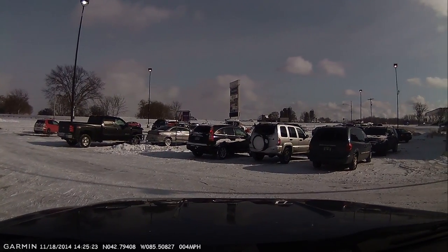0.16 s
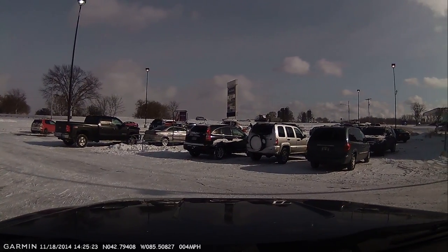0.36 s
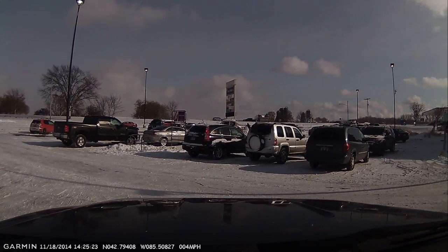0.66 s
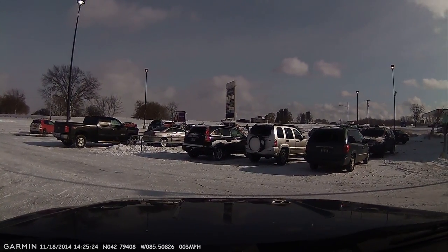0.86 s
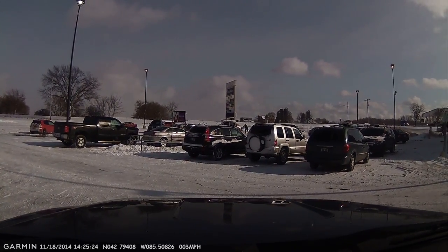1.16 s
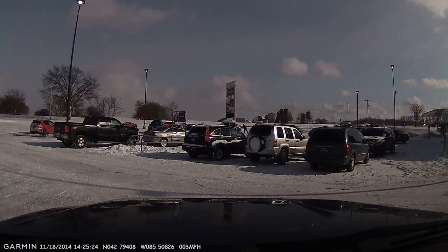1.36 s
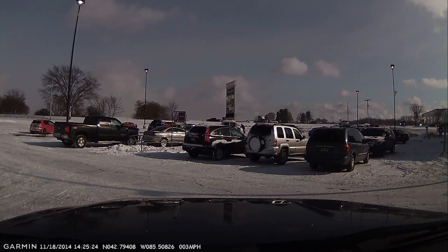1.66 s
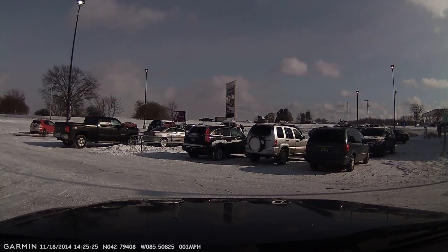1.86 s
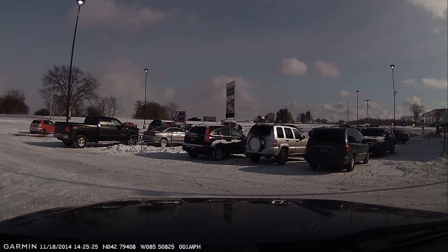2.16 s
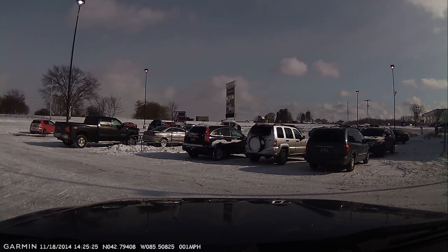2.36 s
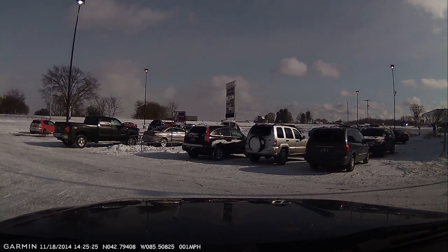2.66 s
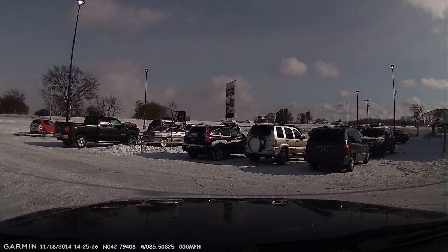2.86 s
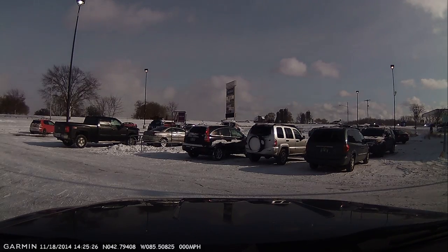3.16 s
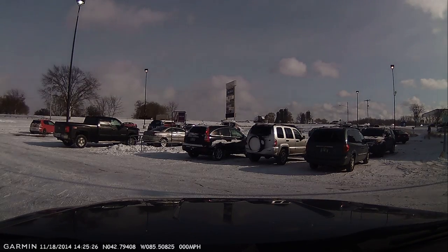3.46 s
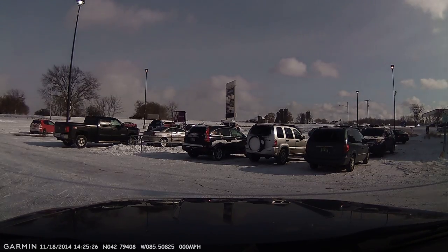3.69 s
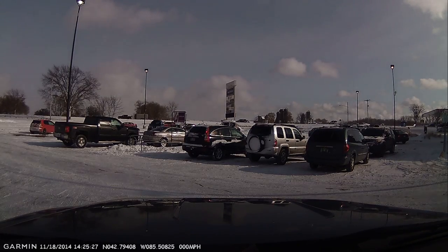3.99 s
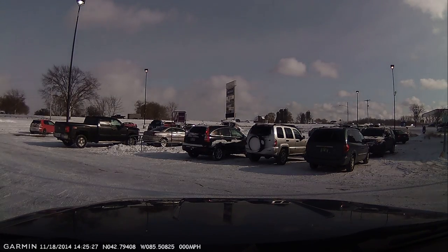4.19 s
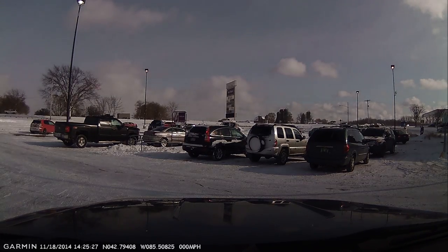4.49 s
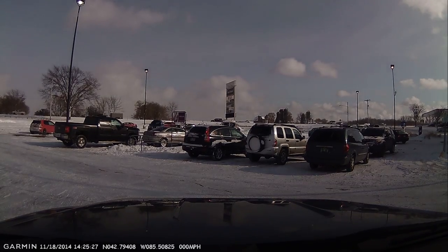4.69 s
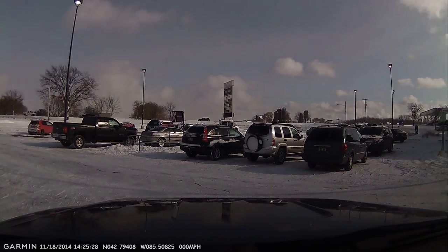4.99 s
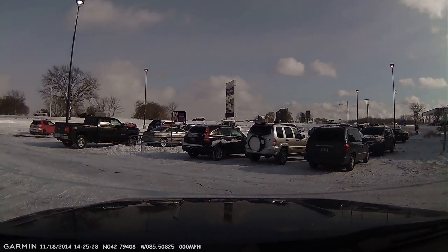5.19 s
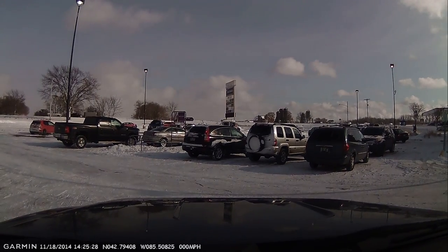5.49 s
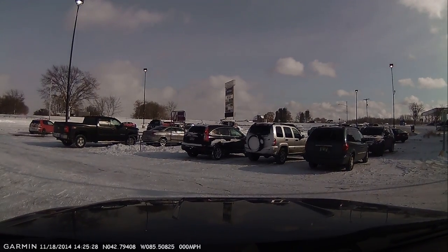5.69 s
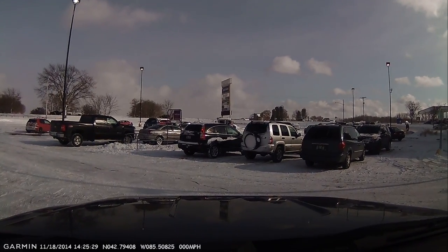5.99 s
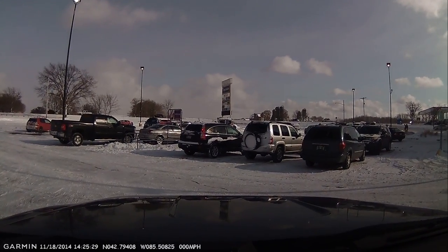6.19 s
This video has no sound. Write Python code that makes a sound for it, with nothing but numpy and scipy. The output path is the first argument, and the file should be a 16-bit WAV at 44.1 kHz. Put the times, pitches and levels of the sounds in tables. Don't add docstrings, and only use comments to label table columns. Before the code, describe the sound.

A small windscreen microphone in a closed cabin picks up low, bassy engine throb, rocking body thuds and constant hiss. First there is only slow rolling, then a flurry of scrapes and dull console knocks, two heavier blows amid coat rustle, faint fingertip rubbing, and bright, very close plastic clicks as the parked car idles.

```python
import sys
import numpy as np
from scipy import signal
from scipy.fft import rfft, irfft
from scipy.io import wavfile
from scipy.ndimage import uniform_filter1d

SR = 44100
rng = np.random.default_rng(int(sys.argv[2]) if len(sys.argv) > 2 else 0)


def generate_wav(signal):
    frames = np.transpose(np.atleast_2d(signal))
    scaled = np.clip(frames, -1, 1) * 32767
    pcm = np.round(scaled).astype(np.int16)
    wavfile.write(sys.argv[1], SR, pcm)


def magnitude_from_level(level_db):
    exponent = np.asarray(level_db, float) / 20
    return 10 ** exponent


N = 279594

# time in seconds, firing rate in Hz, firing tone in dB.
ENGINE = [(0, 37.2, -40.5), (.35, 37.22, -38), (.6, 37.2, -49.5), (1.6, 37.52, -44.5), (1.95, 46, -42.5),
          (2.6, 44.95, -47), (3.1, 43.5, -55), (3.7, 42.27, -49), (4.2, 41.42, -45.5), (5.7, 41.1, -45),
          (6.34, 41.1, -50)]
# time in seconds, level in dB.
ROLLING = [
    (0.0, -45.5),
    (0.92, -47),
    (1.78, -42),
    (2.14, -45),
    (3.0, -46),
    (3.6, -44.5),
    (3.83, -41.5),
    (4.45, -47.5),
    (5.08, -46),
    (6.34, -47),
]
# frequency in Hz, density in dB per Hz.
RUMBLE = [(29, -39), (50, -10.5), (81, -3.5), (135, -10.5), (199, -14), (264, -17.5), (296, -18),
          (474, -26), (516, -23.5), (1500, -41), (1950, -108), (3300, -120)]
# frequency in Hz, width in Hz, level in dB.
CABIN_MODES = [(70.5, 13.5, -47.5), (118, 18, -57.5), (150, 4, -62), (195.7, 10, -56), (537, 30, -67)]
# peak in seconds, frequency in Hz, level in dB, length in seconds.
ROCKS = [(0.018, 27.5, -33, .2), (0.364, 31.2, -42, .25), (0.488, 25, -37.5, .12), (.78, 20.7, -36, .5),
         (1.17, 21.2, -36.5, 0.29), (1.577, 26.8, -45, .3), (2.362, 28.2, -41.5, 0.21),
         (2.658, 29, -42.5, 0.16), (2.817, 28.7, -46.5, .3), (3.321, 28.8, -39, .18),
         (3.573, 26, -40.5, .2), (3.902, 26.7, -35.5, .25), (4.151, 28.2, -33.5, 0.17),
         (4.342, 28, -48, .12)]
# frequency in Hz, density in dB per Hz.
HISS = [(530, -12), (900, -7), (1470, -1), (1920, -2), (2360, -4), (13800, -7), (16000, -6)]

# peak in seconds, level in dB, tilt in dB per octave, ring in Hz, decay
# (t60) in seconds.
CRACKS = [
    (1.4418, -41, -5, 1698, 0.035),
    (1.6892, -44.5, -1, 5600, 0.02),
    (1.7708, -35.5, -2.5, 2700, 0.061),
    (1.8372, -42, 0, 2780, 0.09),
    (1.878, -54, -8, 2780, 0.071),
    (2.324, -50, -13, 1320, .04),
    (2.7129, -50.5, 0, 3180, 0.04),
    (3.516, -46.5, -7, 1880, 0.045),
    (4.095, -55, 5, 10950, 0.053),
    (4.112, -50, -5, 800, 0.06),
]
# peak in seconds, level in dB, tilt in dB per octave, ring
# in Hz, decay (t60) in seconds.
SCUFFS = [(1.042, -55, -4.5, 1340, .04), (1.170, -42.5, -6, 1200, 0.09), (1.233, -44, -5, 1600, .13),
          (1.325, -53, -9, 1480, 0.04), (1.431, -48, -11, 1000, 0.1), (1.453, -45.5, -16, 1200, 0.08),
          (1.697, -46.5, -12, 1040, 0.067), (1.785, -43, -8, 1610, 0.15), (1.846, -50, 4, 6400, 0.061),
          (1.905, -58, -9, 2800, 0.11), (2.337, -51, 0.5, 1410, 0.075), (2.577, -46, 1, 4500, 0.07),
          (2.594, -46.5, 2, 5910, 0.061), (2.745, -45, 2, 1445, 0.045), (3.217, -33, -4.5, 1250, 0.07),
          (3.225, -44.5, -1, 1800, 0.088), (3.759, -38.5, -5, 2040, 0.029), (5.584, -58, -2.5, 1895, 0.036),
          (1.165, -48, -10, 1000, .05), (3.768, -47, -14, 1000, .06), (1.25, -50, -12, 1700, .08),
          (2.592, -50, -14, 700, .05)]
# end of the build-up in seconds, level in dB, tilt in
# dB per octave, ring in Hz, decay (t60) in seconds.
SCRAPES = [
    (1.577, -43, -4, 2500, 0.2),
    (1.591, -38.5, -5, 1100, 0.1),
    (1.606, -49, -3, 1830, 0.07),
    (3.576, -46, -1.5, 2450, 0.076),
]
# peak in seconds, level
# in dB, tilt in dB per octave, ring in Hz, decay (t60) in seconds.
GRAINS = [(1.5588, -50, -8, 1930, .03), (1.5713, -46, -8, 2690, .03), (1.5805, -43, 2, 2000, .03),
          (1.5872, -42, 1, 1610, .025), (1.598, -48, 1, 1800, .04), (1.222, -54, -10, 1600, .04),
          (1.800, -50, -10, 2300, .14), (3.2125, -45, -3, 1300, .04), (1.3225, -56, -10, 1700, .04),
          (2.736, -53, 3, 3100, .04)]
# lower edge in Hz, upper edge in Hz.
SCUFF_BANDS = [(600, 1200), (1200, 2400), (2400, 4800), (4800, 8000), (8000, 14000)]

# start in seconds, level in dB, lower mode in Hz, decay (t60) in seconds, upper mode in dB.
KNOCKS = [(1.162, -33.5, 361, 0.11, -6), (1.222, -32, 267, 0.055, -4), (1.231, -35, 388, 0.07, -7.5),
          (1.252, -36, 245, 0.1, -1), (1.429, -37, 220, 0.065, -1), (1.446, -39, 390, 0.06, 0.5),
          (1.562, -42.5, 345, 0.082, -5), (1.587, -30, 360, 0.088, -19), (1.692, -38, 318, 0.043, -3),
          (1.773, -29.5, 398, 0.079, -2), (1.84, -34.5, 402, 0.08, -2), (1.896, -46, 409, 0.12, -3),
          (3.211, -23.5, 310, 0.06, -15), (3.2185, -19, 413, 0.094, -32), (3.2285, -31, 258, 0.12, -4),
          (3.515, -39, 506, 0.034, -16), (3.603, -39, 296, 0.038, -26), (3.7552, -25, 452, 0.03, -16),
          (3.7627, -24, 412, 0.045, -16), (3.781, -42, 480, .05, -4), (4.035, -46.5, 490, 0.03, -17),
          (4.11, -40, 364, 0.044, -10)]
# start in seconds, level in dB, pitch in Hz, decay (t60) in seconds.
JINGLES = [(1.5872, -41, 6480, .02), (1.7704, -40, 2805, .035), (1.8369, -41, 2770, .025),
           (1.879, -50, 2810, .04), (1.904, -58, 2820, .03), (2.325, -51.5, 1356, .06),
           (2.578, -57, 1390, .06), (2.576, -52, 3200, .05), (2.712, -54, 1350, .08),
           (2.712, -55, 3170, .05), (2.741, -49.5, 1390, .08), (2.741, -51.5, 3150, .06),
           (3.215, -37, 1433, .06), (3.2187, -38, 860, .06), (3.745, -51, 4720, .05),
           (5.583, -54, 952.3, .06), (1.598, -48, 6480, .025), (1.612, -56, 6480, .03),
           (1.5872, -49, 11700, .025), (1.598, -54, 11500, .03), (1.5665, -60, 11600, .04),
           (1.581, -49, 7500, .02), (1.786, -47, 2600, .03), (2.699, -61, 3190, .03),
           (3.228, -41, 856, .05), (3.229, -45, 1880, .04), (3.222, -42, 1100, .05),
           (1.228, -46, 1520, .04), (1.170, -52, 1900, .04), (5.018, -62, 3006, .03),
           (2.775, -56, 1400, .06), (3.759, -46, 1922, .025), (3.7552, -22.5, 455, .012),
           (3.7626, -24, 415, .012), (3.762, -51, 950, .06), (1.848, -50, 2500, .04),
           (1.857, -53, 2000, .04), (1.378, -55, 958, .04), (1.237, -49, 1500, .04),
           (1.245, -54, 1750, .04)]
# start in seconds, level in dB, pitch in Hz, decay (t60) in seconds.
BOOMS = [(1.163, -38, 150, 0.18), (1.166, -40, 250, .12), (1.226, -30, 77.3, 0.084),
         (1.23, -36.5, 152, 0.1), (1.428, -45, 79, .15), (1.446, -36, 124, 0.16), (1.563, -37.5, 109, 0.13),
         (1.587, -33.5, 160, 0.1), (1.692, -48, 116, .15), (1.773, -21.5, 92, 0.24),
         (1.776, -23.5, 57.7, 0.22), (1.775, -32.5, 128.5, 0.17), (1.842, -27, 101.2, 0.27),
         (1.896, -33.5, 92, 0.2), (3.219, -29.5, 76.5, 0.37), (3.231, -31.5, 118, 0.14),
         (3.23, -33.5, 190, 0.17), (3.7597, -27, 110, 0.06), (3.772, -32, 75, 0.13),
         (3.7615, -31, 200, .05), (4.11, -40.5, 145, 0.099)]

# peak in seconds, rise in seconds, fall in seconds, level in dB, weave pitch at the peak in Hz.
SWISHES = [
    (1.87, .02, 0.18, -61, 1750),
    (2.146, 0.13, .18, -59.5, 1590),
    (2.755, .01, 0.046, -58, 1400),
    (2.97, .2, .2, -59, 1500),
    (3.10, .14, .14, -58, 1900),
    (3.26, .02, 0.097, -55.5, 1820),
    (3.55, 0.24, .12, -55.5, 2000),
    (3.73, .15, .05, -52, 2110),
    (3.84, 0.071, .25, -51.5, 2050),
    (4.244, 0.13, .1, -61, 1775),
]
# peak in seconds, rise in seconds, fall in seconds, level in dB.
FIZZES = [(2.146, 0.091, .15, -59), (2.83, .04, .07, -66), (3.042, 0.21, .2, -63.5),
          (3.574, 0.087, .04, -59.5), (3.752, .1, 0.047, -57), (3.83, .05, .35, -58.5),
          (4.25, .08, .08, -68)]
# peak in seconds, rise in seconds, fall in seconds, level in dB, pitch in Hz.
CREAKS = [(2.895, .01, .14, -62, 1370), (3.11, .015, .04, -58, 1900), (3.17, .03, .03, -66, 2350),
          (3.715, .025, .04, -56, 2100), (3.64, .03, .04, -61, 1950), (3.81, .02, .05, -57, 2150)]

# start of the hold in seconds, hold in seconds, low ring in dB, high ring
# in dB.
RUBS = [
    (4.33, 0.061, -63, -78),
    (4.41, .125, -61.5, -64),
    (4.58, .08, -65.5, -74),
    (5.199, .03, -72, -85),
    (5.869, 0.043, -68, -82),
    (4.67, .04, -72, -76),
]
# frequency in Hz, width in Hz, level in dB, ring it belongs to (0 low, higher values round down).
RUBBED = [(800, 820, -3.5, 0), (2380, 2900, 1.5, 0), (2984, 280, -2.5, 0), (6200, 600, -5, 1),
          (7350, 700, 3.5, 1), (11090, 1100, -12.5, 0.9)]
# start in seconds, level in dB, treble rings in dB, low ring in dB, crack in dB.
BUTTONS = [
    (4.913, -21.5, -1.5, -8, -14),
    (4.9363, -30.5, -10, 0, 1),
    (4.998, -40, -7, -3, 5.5),
    (5.969, -22, -0.5, -10, -10.5),
]
# frequency in Hz, level in dB, decay (t60) in seconds.
CASE = [(1340, -8.5, 0.0057), (1820, -4, 0.012), (2640, 2, 0.0054), (3000, 1, 0.021), (3960, -3, 0.008),
        (4900, -14, 0.0068), (5540, -7, 0.01), (6340, 5, 0.0068), (7420, 9, 0.0044), (11500, -6, 0.0033),
        (3090, -9, .027), (8600, -10, .005), (12600, -7, .003)]
# frequency in Hz, level in dB, decay (t60) in seconds.
LATCH = [(1000, 1.5, 0.0081), (1300, -9, 0.013), (1752, 5.5, 0.0094), (2500, -6, .008), (2950, -4, 0.011),
         (4400, -24, .004), (6400, -12, 0.0093)]

CLOTH_DEPTH_DB = -14


def evened(x):
    return x / np.sqrt(np.mean(x ** 2) + 1e-20)


def peaked(x, size):
    return x / np.sqrt(uniform_filter1d(x ** 2, size).max())


def band(x, lo_hz, hi_hz):
    return signal.sosfilt(signal.butter(2, [lo_hz, hi_hz], "bandpass", fs=SR, output="sos"), x)


def below(x, hz):
    return signal.oaconvolve(x, signal.firwin(701, hz, window=("kaiser", 9), fs=SR), "same")


def coloured(points):
    hz, db = np.transpose(points)
    log_hz = np.log(np.fft.rfftfreq(N, 1 / SR) + 1)
    gain = magnitude_from_level(np.interp(log_hz, np.log(hz), db, -120, -120))
    return evened(irfft(rfft(rng.standard_normal(N)) * gain, N))


def resonate(x, hz, width):
    turn = np.exp(2j * np.pi * np.cumsum(hz * np.ones(len(x))) / SR)
    r = np.exp(-np.pi * width / SR)
    return 2 * (turn * signal.lfilter([1 - r], [1, -r], x / turn)).real


def resonate_twice(x, hz, width):
    return evened(resonate(resonate(x, hz, width), hz, width))


def ring(modes, seconds, rise):
    t = np.arange(round(seconds * SR)) / SR
    sines = np.zeros(len(t))
    for k, (hz, db, t60) in enumerate(modes):
        sines += (-1) ** k * magnitude_from_level(db - 60 * t / max(t60, .002)) * np.sin(2 * np.pi * hz * t)
    return sines * (1 - np.exp(-t / rise))


def swell(rise, hold, fall, depth_db):
    rise, hold, fall = np.maximum([rise, hold, fall], 1e-3)
    t = np.arange(0, rise + hold + fall, 1 / SR)
    corners = [0, rise, rise + hold, rise + hold + fall]
    return np.interp(t, corners, [depth_db, 0, 0, depth_db]), signal.windows.tukey(len(t), .1)


def add(mix, s, sound):
    at = round(s * SR)
    part = mix[max(at, 0):][:len(sound) + min(at, 0)]
    part += sound[max(-at, 0):][:len(part)]


def engine():
    s, hz, db = np.transpose(ENGINE)
    t = np.arange(N) / SR
    turns = np.cumsum(np.interp(t, s, hz)) / SR
    tone = np.sqrt(2) * np.sin(2 * np.pi * turns)
    tone += magnitude_from_level(-8.5) * np.sin(4 * np.pi * turns)
    tone += magnitude_from_level(-23) * np.sin(np.pi * turns)
    return magnitude_from_level(np.interp(t, s, db)) * tone


def cabin():
    t = np.arange(N) / SR
    out = magnitude_from_level(-52.5) * evened(band(rng.standard_normal(N), 10.4, 40.6))
    for s, hz, db, length in ROCKS:
        shape_db, edges = swell(length / 2, 0, length / 2, -17)
        sway = np.sqrt(2) * np.sin(2 * np.pi * hz * t[:len(edges)])
        add(out, s - length / 2, magnitude_from_level(db + shape_db) * edges * sway)
    hums = np.zeros(N)
    for hz, width, db in CABIN_MODES:
        hums += magnitude_from_level(db) * resonate_twice(rng.standard_normal(N), hz, width)
    swell_db = np.interp(t, *np.transpose(ROLLING))
    return out + magnitude_from_level(swell_db - 1.5) * coloured(RUMBLE) + magnitude_from_level(swell_db + 43.5) * hums


def scuffs():
    out, t = np.zeros(N), np.arange(6000) / SR
    crack_rise_s, scuff_rise_s, scrape_build = .00099, .005, .17
    rows = [(*row, crack_rise_s) for row in CRACKS]
    rows += [(*row, scuff_rise_s) for row in SCUFFS]
    rows += [(*row, scrape_build * row[-1]) for row in SCRAPES]
    rows += [(*row, crack_rise_s) for row in GRAINS]
    noises = rng.standard_normal((len(rows), 6, len(t)))
    for (s, db, tilt_db, ring_hz, t60, rise), (grit, *fibres) in zip(rows, noises):
        rise = np.clip(rise, .0003, .04)
        fall_db = -18 * np.maximum(1 - t / rise, 0) - 60 * np.maximum(t - rise, 0) / max(t60, .005)
        slips = magnitude_from_level(3.2 * evened(uniform_filter1d(grit, 50))) * np.minimum(t / .0003, 1)
        burst = magnitude_from_level(-1.5 + .9 * fall_db) * evened(resonate(fibres[0] * slips, ring_hz, 300))
        for k, edges in enumerate(SCUFF_BANDS):
            band_db = tilt_db * max(k - 1, 0)
            if k == 0:
                band_db -= 5 + .45 * max(tilt_db, -10)
            level = magnitude_from_level(band_db + (.75 + .16 * k) * fall_db)
            burst += level * evened(band(fibres[k] * slips, *edges))
        add(out, s - rise, magnitude_from_level(db) * peaked(burst, size=150))
    return out


def knocks():
    out, t = np.zeros(N), np.arange(8820) / SR
    upper_mode, jingle_pair = 1.45, 1.12
    mute_db_per_s = 5000
    firm_db = -30
    blows = [(s, db, hz, t60, upper_mode * hz, upper_db) for s, db, hz, t60, upper_db in KNOCKS]
    blows += [(s, db, hz, t60, jingle_pair * hz, -12) for s, db, hz, t60 in JINGLES]
    gaps = np.append(np.diff([row[0] for row in KNOCKS]), np.ones(len(JINGLES) + 1))
    shakes = rng.standard_normal((len(blows), len(t)))
    for (s, db, hz, t60, second_hz, second_db), gap, shake in zip(blows, gaps, shakes):
        modes = ring([(hz, 0, t60), (second_hz, second_db, t60)], len(t) / SR, 1.07 / hz)
        clatter = resonate_twice(shake, hz, 0.5 * hz) * magnitude_from_level(-60 * t / (1.86 * t60))
        clatter *= .33 * magnitude_from_level(min(firm_db - db, 3)) * np.minimum(t / 0.0039, 1)
        level = magnitude_from_level(db - mute_db_per_s * np.maximum(t - gap, 0))
        add(out, s, level * peaked(modes + clatter, size=300))
    for s, db, hz, t60 in BOOMS:
        add(out, s, magnitude_from_level(db) * peaked(ring([(hz, 0, t60)], .4, 0.0032), size=800))
    return out


def rustles():
    out = np.zeros(N)
    sag_per_db = .012
    wander, patchy_db = .045, 2.5
    weave_share = .36
    threads, air, fibres, grit, folds, patches = rng.standard_normal((6, N))
    folds = evened(uniform_filter1d(uniform_filter1d(folds, size=1500), size=1500))
    patches = evened(uniform_filter1d(uniform_filter1d(patches, size=1500), size=1500))
    grains = magnitude_from_level(2.0 * evened(uniform_filter1d(grit, 300)))
    wash = evened(band(air * grains, 790, 4200))
    fizz = evened(band(fibres * grains, 4610, 12700))
    drag = threads * grains * magnitude_from_level(patchy_db * patches)
    for s, rise, fall, db, top_hz in SWISHES:
        shape_db, edges = swell(rise, 0, fall, CLOTH_DEPTH_DB)
        start = round((s - rise) * SR)
        here = slice(start, start + len(edges))
        hz = top_hz * (1 + sag_per_db * shape_db + wander * folds[here])
        weave = resonate_twice(drag[here], hz, 620)
        cloth = np.sqrt(weave_share) * weave + np.sqrt(1 - weave_share) * wash[here]
        add(out, s - rise, magnitude_from_level(db + shape_db) * edges * cloth)
    for s, rise, fall, db in FIZZES:
        shape_db, edges = swell(rise, 0, fall, CLOTH_DEPTH_DB)
        start = round((s - rise) * SR)
        add(out, s - rise, magnitude_from_level(db + shape_db) * edges * fizz[start:start + len(edges)])
    return out


def creaks():
    out = np.zeros(N)
    noises = rng.standard_normal((len(CREAKS), 2, SR // 2))
    for (s, rise, fall, db, hz), (rasp, grit) in zip(CREAKS, noises):
        shape_db, edges = swell(rise, 0, fall, CLOTH_DEPTH_DB)
        slips = (rasp * magnitude_from_level(3 * evened(uniform_filter1d(grit, size=150))))[:len(edges)]
        add(out, s - rise, magnitude_from_level(db + shape_db) * edges * resonate_twice(slips, hz, .14 * hz))
    return out


def rubs():
    out = np.zeros(N)
    rise_s, fall_s = .03, .07
    for (s, hold, *rings_db), noise in zip(RUBS, rng.standard_normal((len(RUBS), 2, SR // 2))):
        shape_db, edges = swell(rise_s, hold, fall_s, -20)
        skin, grit = noise[:, :len(edges)]
        slips = skin * magnitude_from_level(2.2 * evened(uniform_filter1d(grit, 200)))
        rings = np.zeros(len(edges))
        for hz, width, db, which in RUBBED:
            rings += magnitude_from_level(db + rings_db[int(which)]) * resonate_twice(slips, hz, width)
        add(out, s - rise_s, magnitude_from_level(shape_db) * edges * rings)
    return out


def buttons():
    out, t = np.zeros(N), np.arange(2646) / SR
    ticks = rng.standard_normal((len(BUTTONS), len(t)))
    for (s, db, treble_db, low_db, crack_db), tick in zip(BUTTONS, ticks):
        modes = []
        for hz, mode_db, t60 in CASE:
            mode_db += treble_db * (hz > 5000 or hz < 1500) + low_db * (1500 < hz < 2000)
            modes.append((hz, mode_db, t60))
        snap = peaked(ring(modes, len(t) / SR, 0.00033), size=100)
        crack = peaked(band(tick * magnitude_from_level(-60 * t / 0.0061), 6300, 14600), size=30)
        shiver = peaked(band(tick[::-1] * magnitude_from_level(-60 * t / .03), 2300, 9000), size=100)
        add(out, s, magnitude_from_level(db) * (snap + magnitude_from_level(crack_db) * crack + magnitude_from_level(-22) * shiver))
    latch_s, latch_db = 5.1367, -33
    add(out, latch_s, magnitude_from_level(latch_db) * peaked(ring(LATCH, .06, 0.00046), size=100))
    return out


def scene():
    around = engine() + cabin() + scuffs() + knocks() + rustles() + creaks() + rubs()
    around = around + 0.52 * resonate(around, 11100, 800)
    return (below(around, 15000) + buttons())[None]


def low_pass(x):
    return signal.sosfilt(signal.butter(12, 16820, fs=SR, output="sos"), x)


def record(dry):
    hiss = magnitude_from_level(-61.5) * below(coloured(HISS), 15750)
    mix = below(dry[0] + hiss, 16600)[None]
    return low_pass(mix)


dry = scene()
out = record(dry)
generate_wav(out)
```